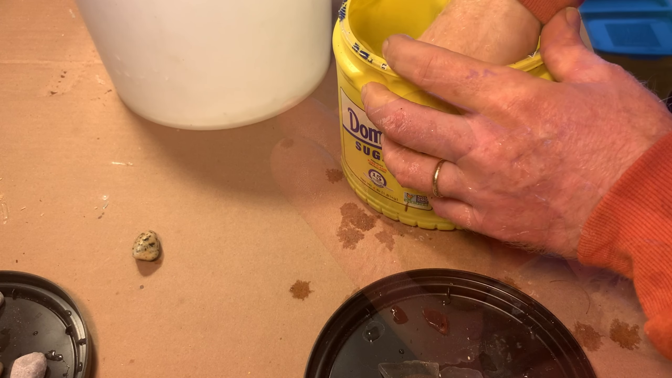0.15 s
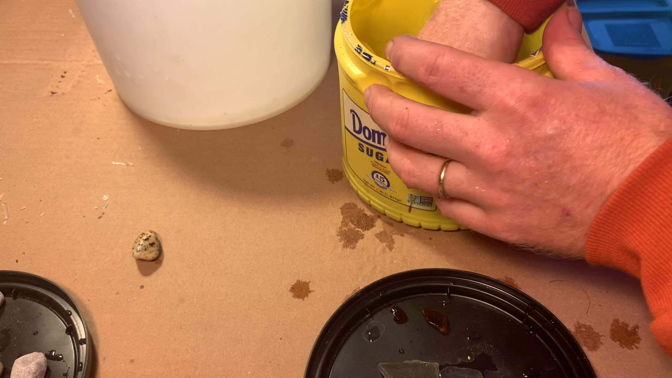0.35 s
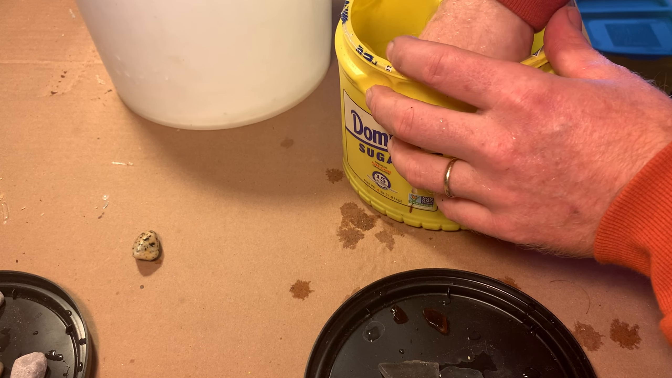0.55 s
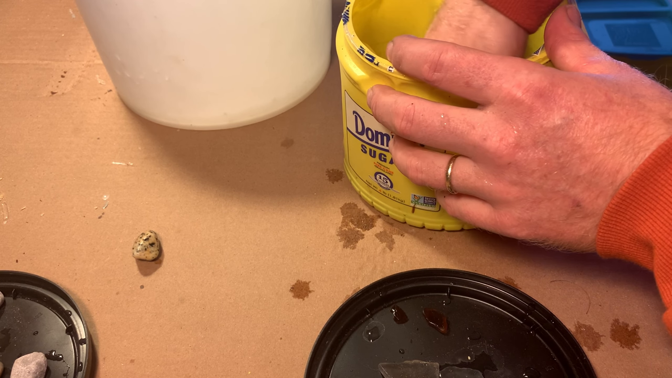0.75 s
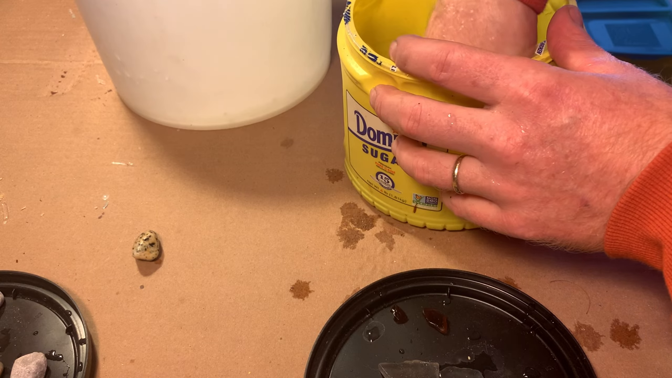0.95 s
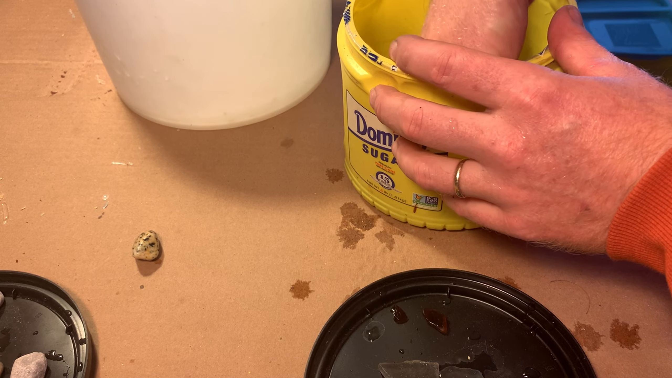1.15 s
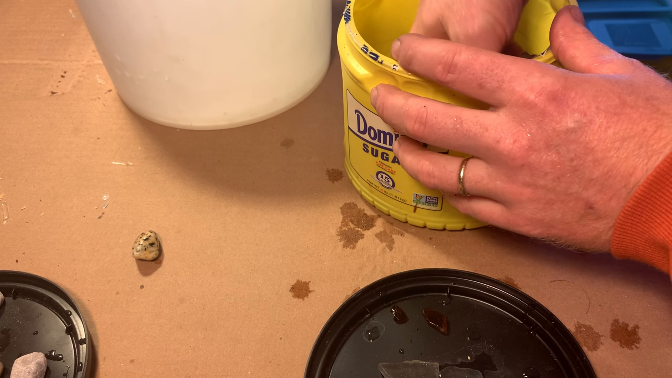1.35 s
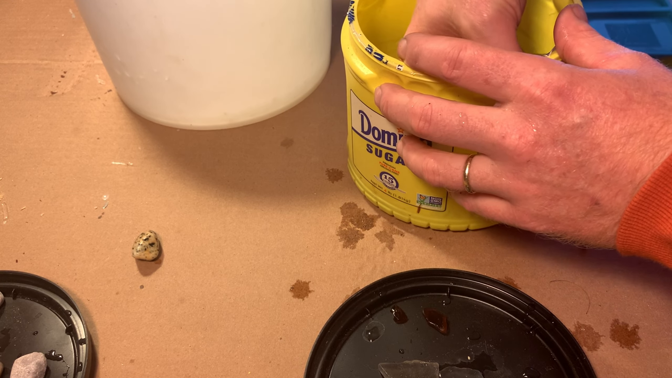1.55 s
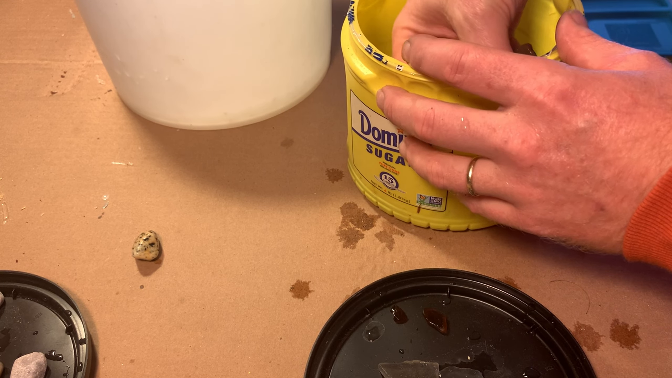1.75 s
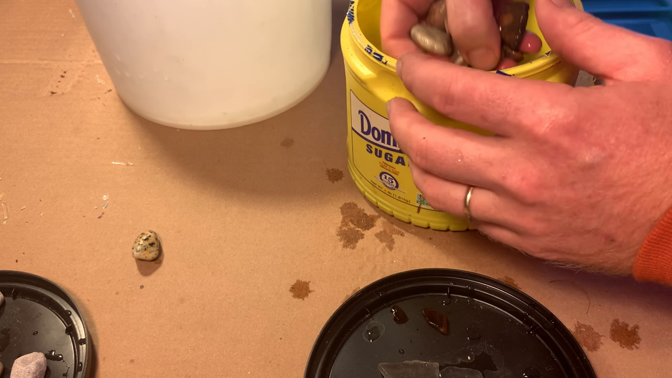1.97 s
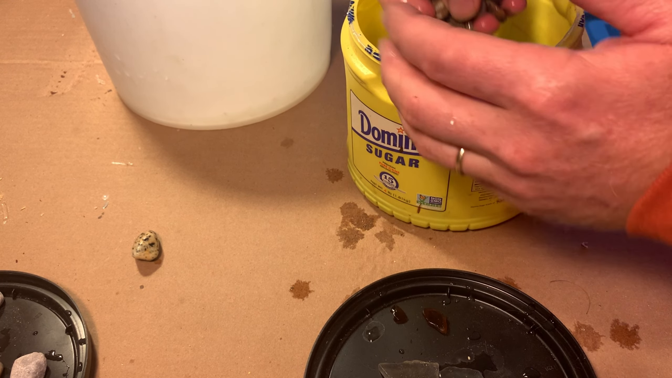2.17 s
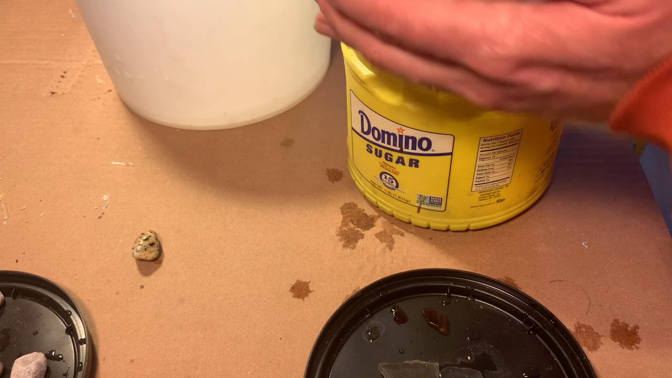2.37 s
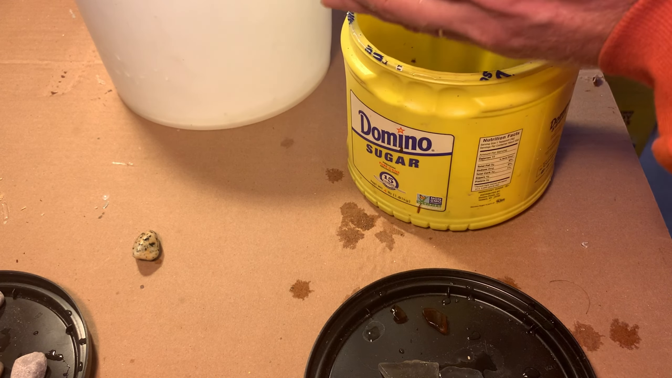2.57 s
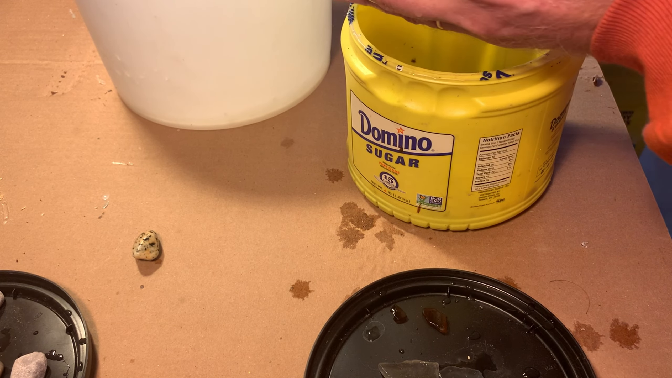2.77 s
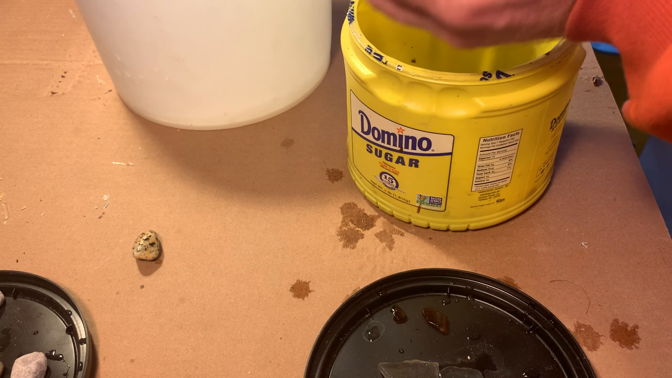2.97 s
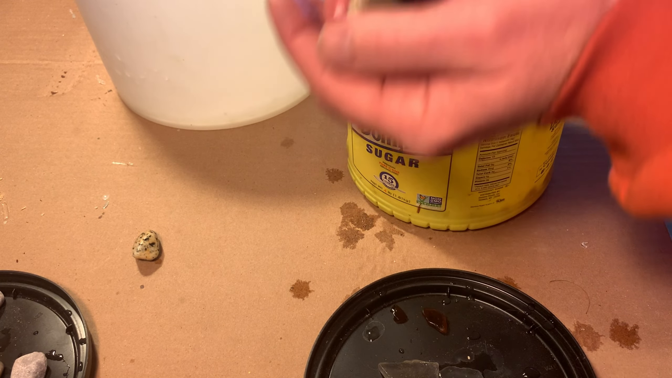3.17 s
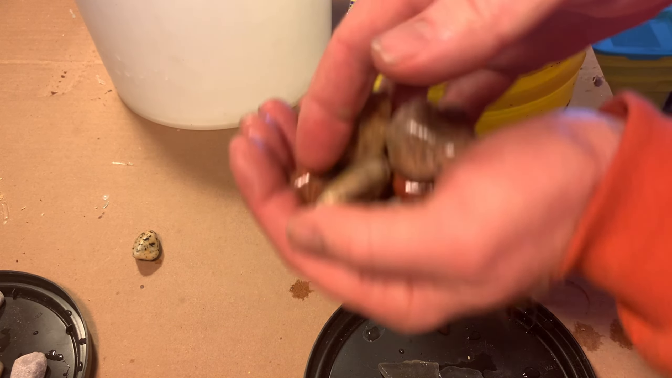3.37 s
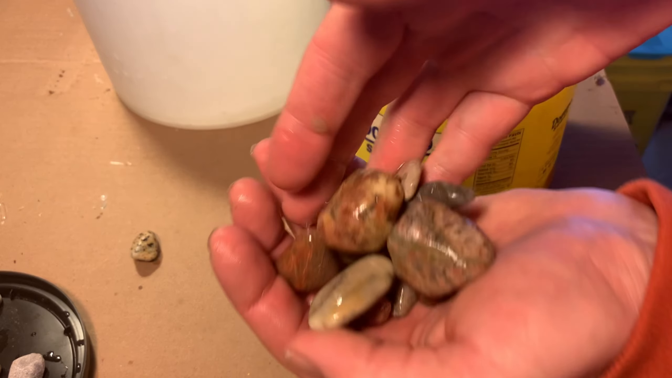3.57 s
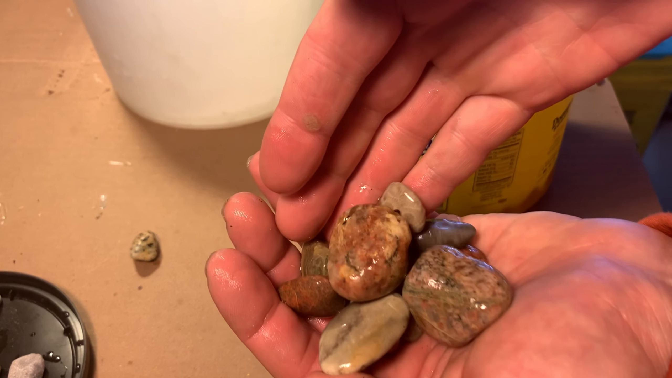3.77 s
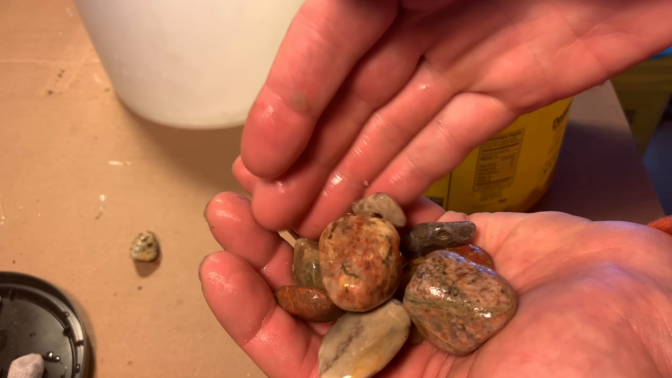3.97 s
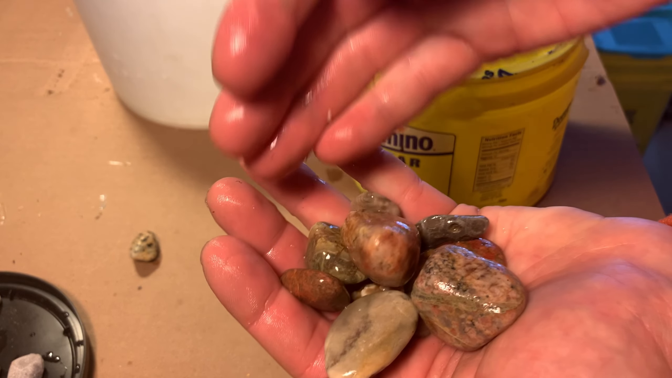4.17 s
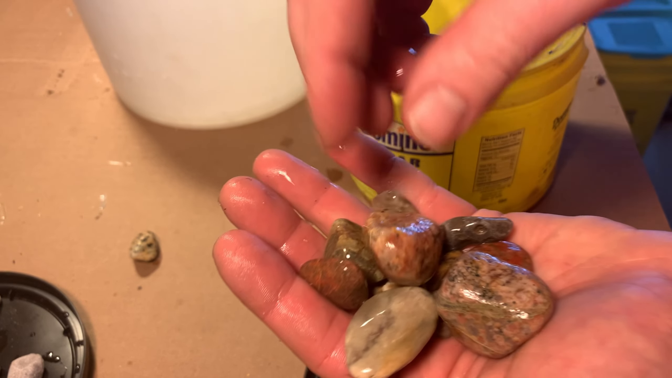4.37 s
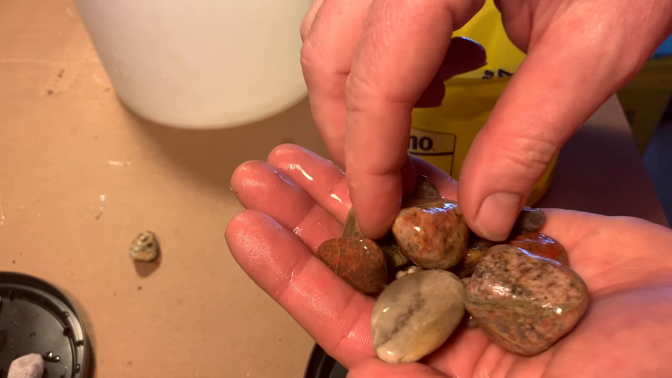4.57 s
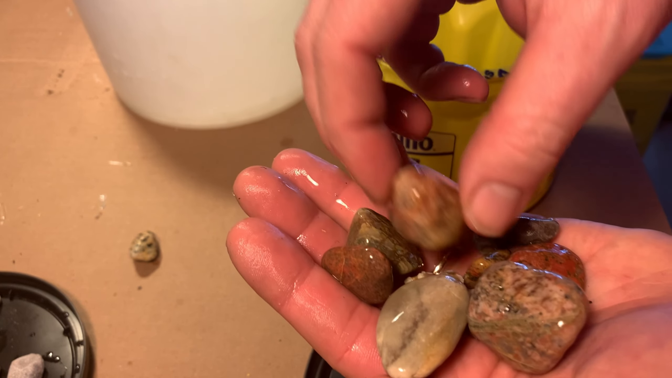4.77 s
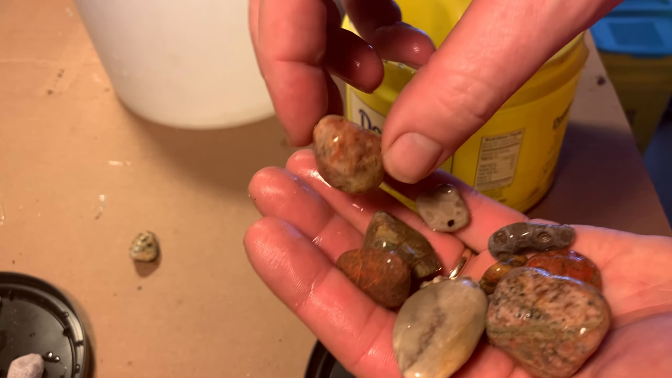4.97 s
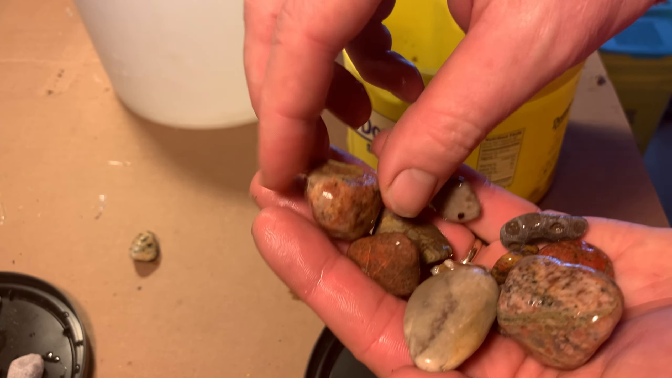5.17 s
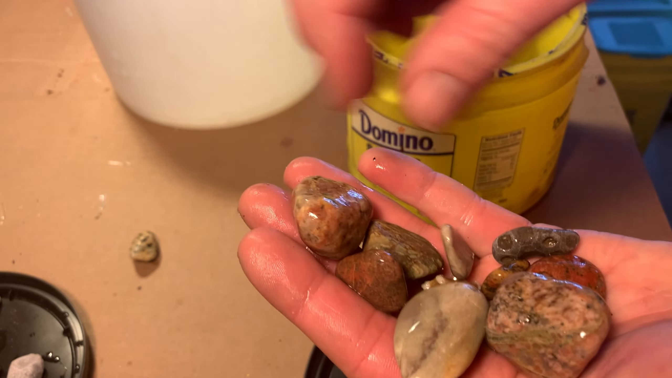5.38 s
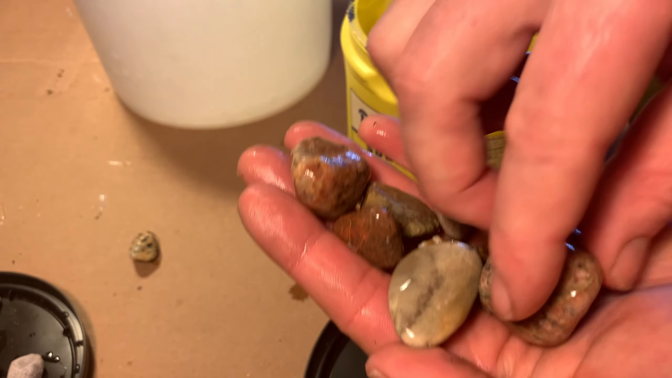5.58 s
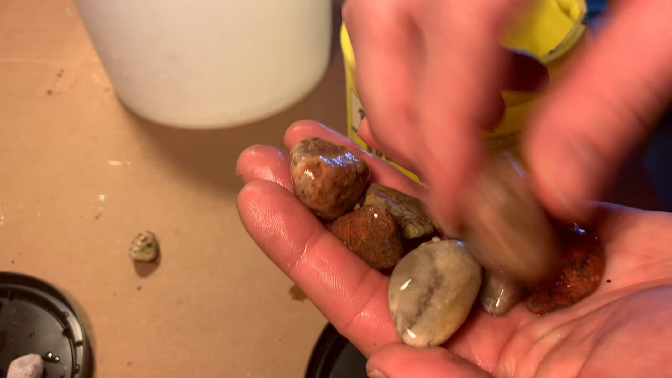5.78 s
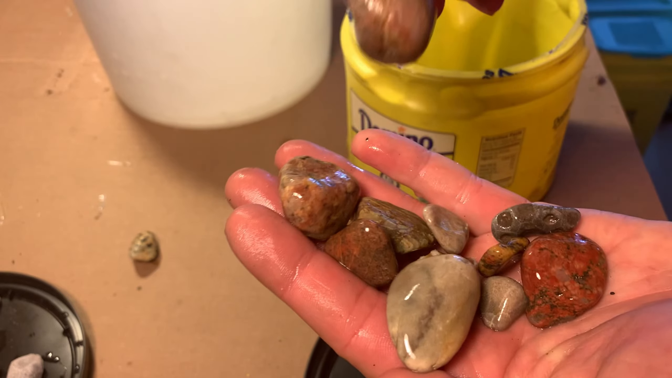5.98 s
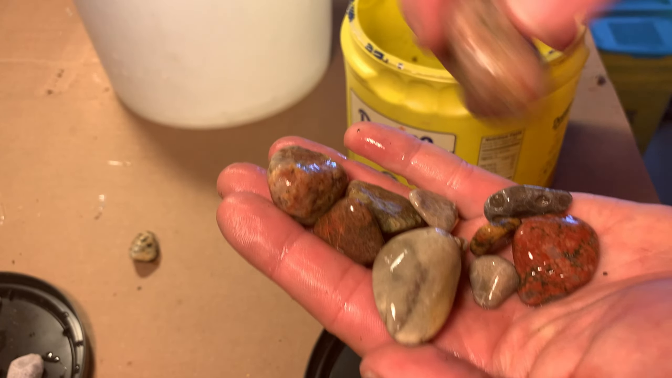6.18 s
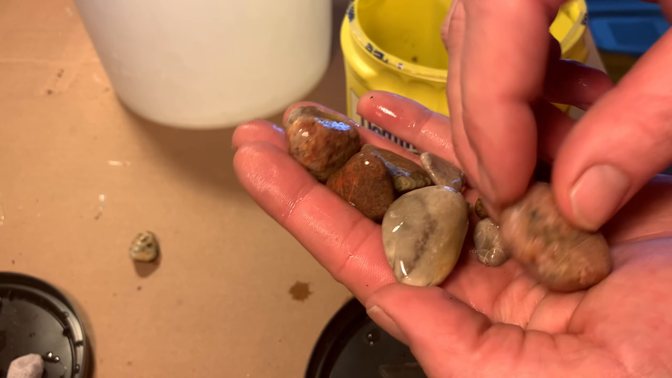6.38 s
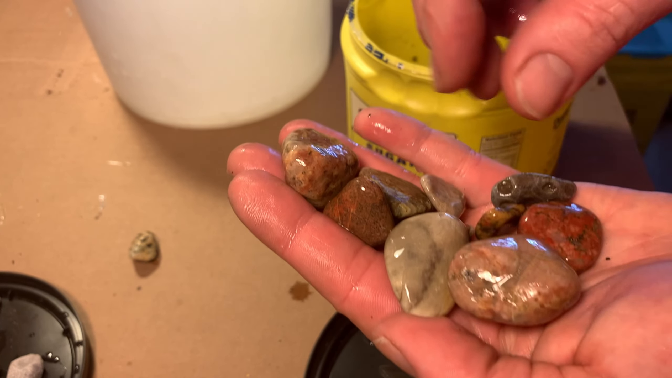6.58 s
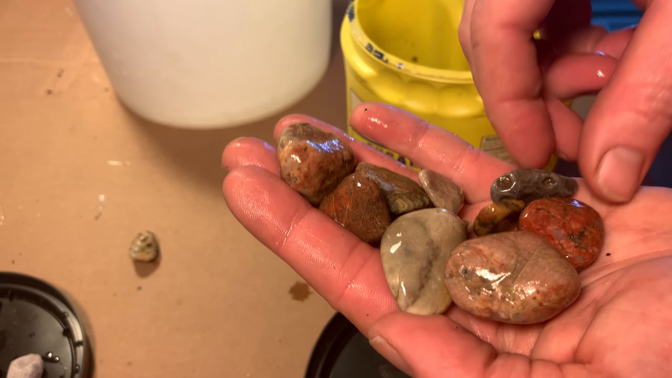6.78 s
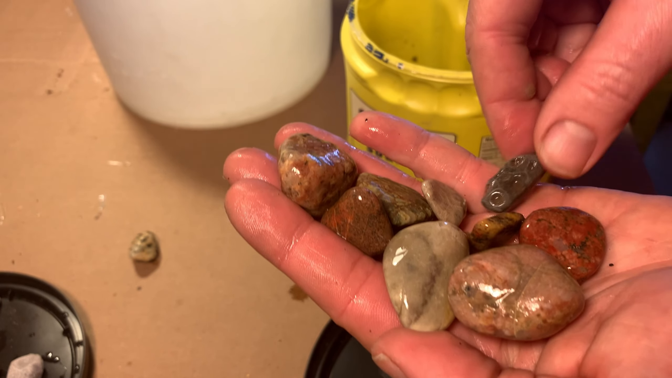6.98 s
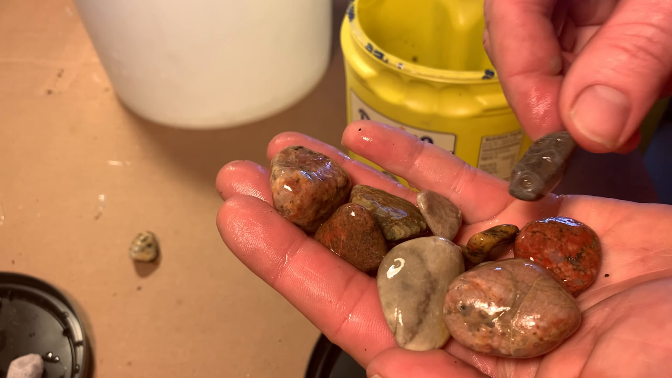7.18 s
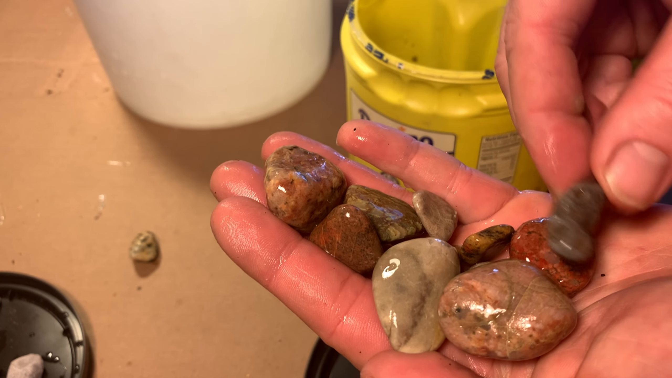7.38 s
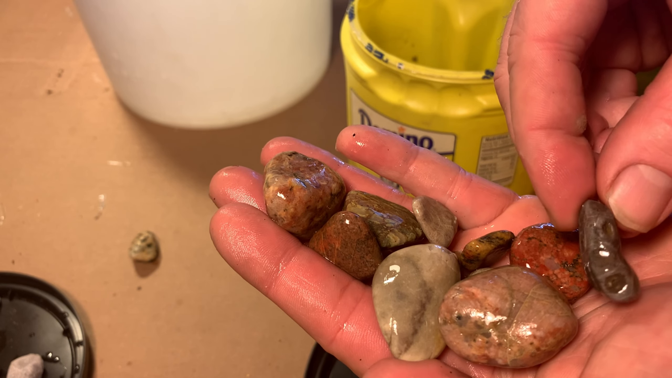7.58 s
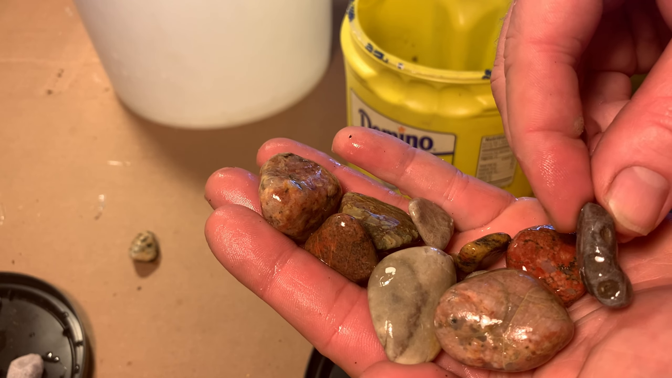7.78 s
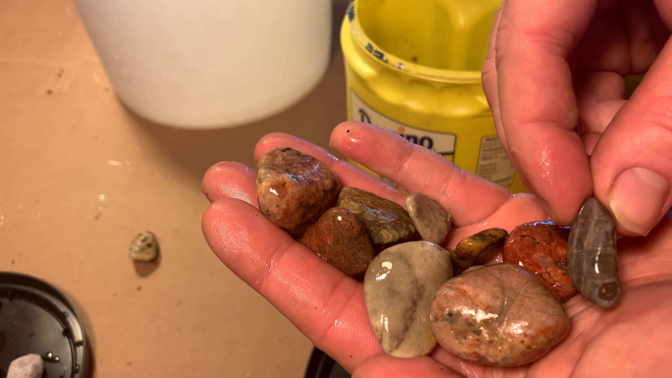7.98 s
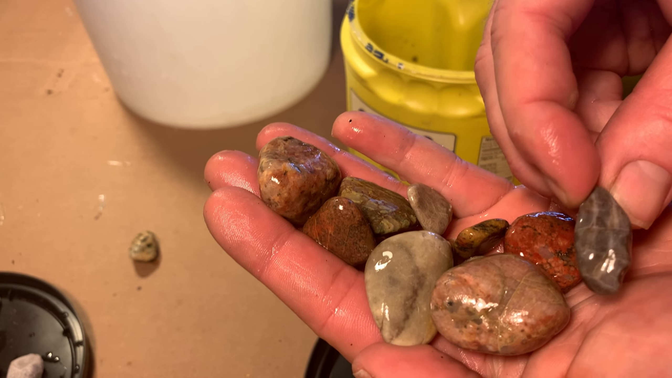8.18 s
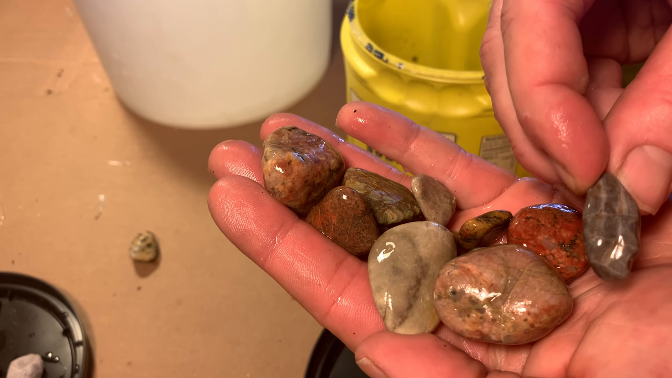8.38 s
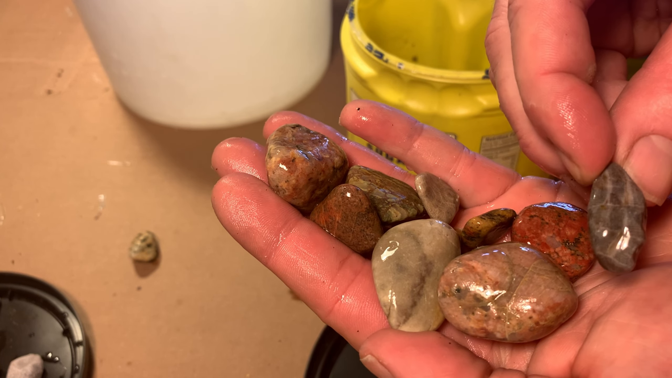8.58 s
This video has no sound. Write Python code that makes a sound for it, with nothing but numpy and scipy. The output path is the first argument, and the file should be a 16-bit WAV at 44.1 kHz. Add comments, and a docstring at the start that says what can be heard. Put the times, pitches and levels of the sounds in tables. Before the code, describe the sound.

A low, steady machine hum and soft rumble run throughout a small, dry, quiet room, heard closely in stereo. From 0 to about 1.3 seconds, wet pebbles are pushed around a plastic tub: dense coarse grinding, irregular clacks ringing the wall and hollow thumps from the floor. It fades to faint rubbing and small ticks until 1.8, then a loud clattering burst comes around 1.95 to 2.1. After a short gap, stones drop back with a strong hollow knock at 2.6 and smaller rattles to 3. From 3.1 to 4.1, bright, dry stone clicks cluster in a cupped hand amid wet skin slides and short scrapes, strongest near 3.25 and 3.75. Clicks then thin out, with small ones near 5.1 and 5.4, soft palm taps near 4.9 and 6.1, and one sharp clear click at 6.5. Faint taps at 7.05 and 7.7 leave only the hum to about 8.5.

```python
"""A small quiet room with a machine humming throughout; a two-port phone stands close by on a table.
First wet pebbles are stirred and scooped in a plastic tub: filtered grit grinds, clacks ring the tub wall
as decaying sines, and heavy blows swell in its hollow. Near 2.6 s a few drop back in.
From 3 s the rest click in a cupped hand, dry and bright: short stone modes with noise snaps, among
scrapes and slides of filtered noise; the clicks thin out and soft taps on the palm last to the end."""
import sys
import numpy as np
from scipy import signal
from scipy.fft import rfft, irfft, next_fast_len
from scipy.io import wavfile
from scipy.ndimage import uniform_filter1d

SR = 44100
rng = np.random.default_rng(int(sys.argv[2]) if len(sys.argv) > 2 else 0)


def master(y):
    """Save y as 16-bit WAV."""
    cut = np.clip(np.atleast_2d(y).T, -1, 1)
    pcm = np.round(cut * 32767)  # scale
    wavfile.write(sys.argv[1], SR, pcm.astype(np.int16))


def boost(x):
    """Linear amplitude factor 10**(x/20) for a level x in decibels (scalar or array-like)."""
    u = np.asarray(x, float) / 20
    return 10 ** u


N = 381068
TIME = np.arange(N) / SR
SIZE = next_fast_len(N + SR)
HZ = np.maximum(np.arange(SIZE // 2 + 1) * SR / SIZE, 1)


def on_hz(points, hz):
    """A (f/Hz, value) table read along a log-frequency axis."""
    f, value = np.transpose(points)
    return np.interp(np.log(hz), np.log(np.maximum(f, 1)), value)


def colour(x, points, peaks=()):
    """Causal filter of unit energy: a smooth spectrum plus resonances, minimum phase from the cepstrum."""
    size = 2 ** 13
    hz = np.maximum(np.arange(size // 2 + 1) * SR / size, 1)
    power = boost(2 * on_hz(points, hz))
    power = power + sum(boost(2 * db) / (1 + (2 * (hz - f) / width) ** 2) ** 2 for f, width, db in peaks)
    cepstrum = irfft(np.log(power) / 2)
    cepstrum[1:size // 2] *= 2
    cepstrum[size // 2 + 1:] = 0
    response = irfft(np.exp(rfft(cepstrum)))
    return signal.fftconvolve(x, response / np.sqrt(np.sum(response ** 2)))[:N]


def band(x, lo_hz, hi_hz, order=2):
    """Butterworth band-pass."""
    edges = [lo_hz, min(hi_hz, SR / 2.2)]
    return signal.sosfilt(signal.butter(order, edges, "band", fs=SR, output="sos"), x)


def add(track, s, burst):
    """Mix a burst in at time s."""
    i = int(s * SR)
    track[..., i:i + burst.shape[-1]] += burst[..., :N - i]


def walk(rate):
    """Random levels held 1 / rate s and slewed; spread near 1."""
    k = int(SR / rate)
    return uniform_filter1d(np.repeat(rng.standard_normal(N // k + 1), k), k)[:N]


def grit(rough_db, rate):
    """A dense stream of tiny contacts whose strength changes rate times a second, rms 1."""
    x = rng.standard_normal(N) * boost(rough_db * walk(rate))
    return x / x.std()


def strokes(table, attack_s, t60):
    """Gain of movements that swell, hold and die away; overlapping ones add in power."""
    power = 0
    for s, length, db in table:
        rise = np.sin(np.pi / 2 * np.clip((TIME - s) / attack_s, 0, 1)) ** 2
        fall_db = -60 * np.maximum(TIME - s - length, 0) / t60
        power = power + (boost(db + fall_db) * rise) ** 2
    return np.sqrt(power)


def ports(x, phase, balance):
    """The left and right microphone ports hear one place with their own phase and level."""
    side = np.array([[.5], [-.5]])
    difference = boost(side * on_hz(balance, HZ)) * np.exp(1j * side * on_hz(phase, HZ))
    return irfft(rfft(x, SIZE) * difference, SIZE)[:, :N]


def room(x, near_t60, near_db, near_hz, t60, wet_db):
    """Near surfaces smear each sound, walls add a dull tail; both are unrelated at the two ports."""
    t = np.arange(SR // 2) / SR
    near, far = rng.standard_normal((2, 2, len(t))) * (1 - np.exp(-t / 0.012))
    near = band(near, 270, near_hz, order=1) * boost(-60 * t / near_t60)
    far = band(far, 300, 4400, order=1) * boost(-60 * t / t60)
    tail = boost(near_db) * near / np.sqrt(np.sum(near ** 2) / 2)
    tail = tail + boost(wet_db) * far / np.sqrt(np.sum(far ** 2) / 2)
    return x + signal.fftconvolve(x, tail, axes=1)[:, :N]


# spectrum of the quiet room: f/Hz, relative level/dB
ROOM_AIR = [(25, -47), (45, -21.5), (80, -8), (140, -31.5), (260, -34), (700, -45), (1100, -46),
            (1500, -55), (2400, -63.5), (16000, -72)]
# booms and whines standing in that air: f/Hz, width/Hz, relative level/dB
ROOM_PEAKS = [(78, 22, -8), (121.4, 26, -17.5), (166.95, 17, -20), (213, 39, -23.5), (940, 11, -37.5),
              (1058, 23, -34), (1177, 25, -41)]
# likeness of the air at the two ports: f/Hz, correlation (0-1)
ROOM_ALIKE = [(60, 0.98), (130, 0.99), (290, 0.7), (640, 0.1)]


def machine():
    """A steady hum over low rumble that booms in the room; the bass is alike left and right."""
    mid, side = (colour(rng.standard_normal(N), ROOM_AIR, ROOM_PEAKS) for _ in range(2))
    alike = np.clip(on_hz(ROOM_ALIKE, HZ), 0, 1)
    mid = rfft(mid, SIZE) * np.sqrt(1 + alike)
    side = rfft(side, SIZE) * np.sqrt(1 - alike)
    air = boost(-49.5) * irfft(np.array([mid + side, mid - side]), SIZE)[:, :N]
    hum = boost(-40 + 0.24 * walk(5.0)) * np.sin(2 * np.pi * 55.2 * TIME)
    return (air + hum) * boost(np.array([[-1.1], [1.1]]))  # the right port hears it louder


# wet fingers and stones sliding on skin: t/s, length/s, level/dB, treble over level/dB
SKIN_SLIDES = [(3.014, 0.13, -73, 8), (3.102, 0.32, -56, 0), (3.52, 0.15, -59.5, 3), (3.68, 0.14, -70, 4),
               (3.949, 0.37, -68, 3), (4.316, 0.083, -58.5, -2.5), (4.533, 0.15, -62.5, -18)]
# spectrum of skin rubbing, close to the microphone: f/Hz, relative level/dB
SKIN_COLOUR = [(600, -19), (1500, 7.5), (3000, 10.5), (6000, -4.5), (10000, -7), (15000, -19.5)]


def slides():
    """Sliding on wet skin: uneven grit for the drag, finer grit for the fizz above it."""
    attack_s, t60 = 0.055, 0.71
    drag = strokes([(s, length, db) for s, length, db, _ in SKIN_SLIDES], attack_s, t60)
    fizz = strokes([(s, length, db + treble_db) for s, length, db, treble_db in SKIN_SLIDES], attack_s, t60)
    low = band(grit(11.0, 160) * drag, 300, 5520)
    high = band(grit(4.0, 270) * fizz, 6200, 16000)
    return boost(3.0) * colour(low + high, SKIN_COLOUR)


# a wet stone scraping over another: t/s (a quarter of the way in), relative level/dB, centre f/Hz, length/s
STONE_SCRAPES = [(3.208, -30.5, 4550, .045), (3.357, -39.5, 3370, .04), (3.406, -36, 3800, .03),
                 (3.626, -29, 5900, 0.034), (4.2157, -36.5, 3680, 0.038), (4.393, -51, 5000, 0.071),
                 (4.5456, -44.5, 4200, 0.055), (4.615, -60, 3480, 0.11), (5.198, -44, 3630, 0.045),
                 (5.316, -63, 3770, .035), (5.547, -54, 2515, 0.021), (5.615, -46, 2790, 0.04),
                 (5.7, -48, 2600, 0.043), (6.8, -50, 4170, 0.04), (6.833, -52.5, 4800, 0.099)]


def scrapes():
    """Wet stone sticks and slips: scattered grains over grit, swelling and fading in a band."""
    out = np.zeros(N)
    grains = (rng.random(N) < 900 / SR) * boost(7.4 * rng.standard_normal(N)) * rng.choice([-1, 1], N)
    rub = 0.55 * grit(3.1, 400) + grains / grains.std()
    for s, db, hz, length in STONE_SCRAPES:
        stroke = np.hanning(int(length * SR))
        stroke = stroke * rub[int(s * SR):][:len(stroke)]
        add(out, s - length / 4, boost(db - 4.5) * band(stroke, hz / 3.3, hz * 1.6, order=3))
    return out


# stones set down softly on the palm: t/s, relative level/dB, centre f/Hz, tick over thud/dB
PALM_TAPS = [(4.926, -44.5, 1193, -12), (6.066, -47.5, 1140, -23.5), (7.051, -55, 1180, -10),
             (7.698, -52.5, 1280, -4.5)]


def taps():
    """The palm damps each stone to a short dull thud with a brighter tick of contact."""
    out = np.zeros(N)
    t = np.arange(SR // 25) / SR
    for s, db, hz, tick_db in PALM_TAPS:
        thud = rng.standard_normal(len(t)) * (1 - np.exp(-t / 0.00063)) * boost(-60 * t / 0.0099)
        thud = band(thud, hz / 1.68, hz * 1.24)
        tick = band(rng.standard_normal(len(t)) * boost(-60 * t / 0.00598), 2000, 6200)
        tap = thud / np.max(np.abs(thud)) + boost(tick_db) * tick
        add(out, s, boost(db + 9.5) * tap / np.max(np.abs(tap)))
    return out


# stones clicking in the hand: t/s, relative level/dB, centre f/Hz,
# bright snap relative level/dB, knock in the palm relative level/dB
HAND_CLICKS = [(3.0946, -44.5, 6910, -35, -24.5), (3.1283, -39.5, 4200, -40, -6),
               (3.209, -28.5, 6370, -30.5, -8.5), (3.2195, -29, 8460, -20, -3),
               (3.24, -11.5, 8800, -8.5, -30), (3.2469, -11, 10360, -17.5, -41),
               (3.2524, -27.5, 9030, -20.5, -35), (3.2857, -34.5, 10230, -17, -32),
               (3.2933, -23.5, 8000, -23, -35), (3.309, -27.5, 5000, -20, -28),
               (3.3147, -17.5, 9870, -21.5, -35), (3.3549, -26.5, 4400, -30, -8.5),
               (3.3834, -17.5, 8000, -28, -34), (3.395, -25.5, 8030, -24.5, -22),
               (3.417, -28, 6050, -19.5, -20), (3.5607, -19, 10430, -19, -42),
               (3.5718, -17, 10600, -16, -37), (3.6018, -19, 6300, -16.5, -26),
               (3.6134, -30.5, 5700, -25, -17), (3.6343, -22.5, 5700, -20, -17),
               (3.654, -34.5, 4400, -36, -22), (3.6865, -33.5, 4350, -33, -29),
               (3.7005, -35.5, 7050, -25.5, -25), (3.7404, -10.5, 8400, -14, -30.5),
               (3.7514, -9.5, 7150, -12, -39), (3.7622, -29, 8520, -19, -23), (3.819, -33, 5960, -25, -23),
               (3.845, -25, 9320, -22.5, -24), (3.962, -32, 4960, -43, -25),
               (3.9713, -38, 4700, -40.5, -17), (4.0161, -33.5, 4750, -34, -16),
               (4.0314, -19, 5920, -38, -21.5), (4.061, -25, 10130, -21, -28),
               (4.076, -17.5, 5000, -19.5, -22), (4.2224, -34, 4270, -23, -27),
               (4.3944, -42, 6220, -23, -19), (4.5985, -50, 4750, -35.5, -18.5),
               (4.672, -41, 3000, -43, -15), (4.7484, -44, 4400, -38, -13), (4.7747, -35, 3820, -53.5, -11),
               (5.1092, -29, 6300, -39, -29), (5.1145, -30.5, 4720, -42.5, -33),
               (5.141, -41.5, 4310, -39.5, -17), (5.199, -37, 8000, -44, -21),
               (5.219, -40.5, 4400, -50.5, -24), (5.386, -17.5, 8470, -23.5, -37),
               (5.397, -29.5, 10600, -19.5, -25), (5.461, -36.5, 7840, -23.5, -25.5),
               (5.621, -48.5, 3000, -51.5, 2), (5.716, -61, 4400, -51, -3), (6.482, -41.5, 4400, -47.5, -1),
               (6.4948, -2.5, 4920, -18, -29), (6.826, -54, 5000, -47.5, -28)]
# the modes a pebble rings with: f/Hz, relative level/dB, t60/s
STONE_MODES = [(3000, 1.5, 0.0067), (3636, -4, 0.008), (4400, 2, 0.007), (5000, 0.5, .007),
               (5700, 0, 0.006), (6300, -0.54, 0.0058), (6800, 1.9, 0.0045), (8000, 1.5, 0.004),
               (8800, 0.9, 0.0037), (9330, 2, 0.0039), (10600, 5.5, .0035)]


def clicks():
    """Each click is a few cycles of stone ring, a dull knock in the palm and a bright snap."""
    out = np.zeros(N)
    t = np.arange(SR // 25) / SR
    mode_hz, mode_db, mode_t60 = np.transpose(STONE_MODES)[:, :, None]
    late_cycles = 2.1  # low modes take longer to build, so a click falls in pitch
    for s, db, hz, snap_db, knock_db in HAND_CLICKS:
        chance = rng.standard_normal((2, len(STONE_MODES), 1))
        # modes near the centre are favoured (dB per octave squared); gentle contacts wake fewer upper ones
        slope = np.where(mode_hz < hz, -49.5, -3.5 + 0.9 * db)
        share = boost(mode_db + slope * np.log2(mode_hz / hz) ** 2 + 2 * chance[0])
        build = 1 - np.exp(-(t * mode_hz / late_cycles) ** 2)
        ring = np.sin(2 * np.pi * mode_hz * (1 + 0.04 * chance[1]) * t)
        chord = np.sum(share * build * boost(-60 * t / mode_t60) * ring, axis=0)
        add(out, s + 0.0008, boost(db + 10.5) * chord / np.sqrt(2 * np.sum(share ** 2)))
        # low f/Hz, high f/Hz, relative level/dB, t60/s
        parts = [(hz / 1.5, hz * 1.3, -11, .006),  # chatter
                 (950, 2900, knock_db, .014),
                 (hz / 3.0, hz / 1.5, -17, .008),  # body of the stone under its ring
                 (12300, 15800, snap_db + 8.0, .003)]
        for lo_hz, hi_hz, part_db, t60 in parts:
            # one hard touch amid chatter
            contact = rng.standard_normal(len(t)) + 2.0 * (np.arange(len(t)) == SR // 2000)
            contact = contact * (1 - np.exp(-t / 0.00025)) * boost(-60 * t / t60)
            noise = band(contact, lo_hz, hi_hz, order=3)
            noise = noise / np.sqrt(np.sum(noise ** 2) / (t60 * SR / 9))
            add(out, s + 0.0006, boost(db + part_db - 1.0) * noise)
    return out


# phase between the ports for the hand: f/Hz, left lead/rad
HAND_PORTS = [(690, 2.9), (1400, 2), (2100, 2.5), (3450, 4.5), (4800, 4), (6200, 4.5), (6900, 8.5),
              (7600, 5.5), (9000, 4.5), (10300, -0.25), (11700, -4.5), (13400, -6.5), (15200, -9.5),
              (16500, -9.5)]


def hand():
    """All that the cupped hand does, with the table top mirroring each sound once."""
    out = slides() + scrapes() + taps() + clicks()
    echo_s, echo_db = .0018, -16.5
    out = out + boost(echo_db) * np.roll(out, int(echo_s * SR))
    balance = [(1000, 7.0), (4000, 1.5), (12000, -2.0)]  # f/Hz, left over right level/dB
    return ports(out, HAND_PORTS, balance)


def ticks():
    """Small stones knocking at random moments within the grind, as a gain with sudden rises."""
    per_s, level_db, scatter_db, t60 = 160, -2, 2.5, 0.031
    when, size = rng.random(N), np.clip(rng.standard_normal(N), -2, 2)
    hits = (when < per_s / SR) * boost(level_db + scatter_db * size)
    return signal.lfilter([1], [1, -boost(-60 / (t60 * SR))], hits)


# the hand pushes through the stones, or they slide back in: t/s, length/s, level/dB
STONE_PUSHES = [(-.03, 0.096, -43), (.04, 0.15, -29.5), (.13, .18, -29.5), (.38, 0.099, -27),
                (.49, 0.094, -30.5), (.65, 0.2, -28), (.86, 0.21, -28.5), (1.11, 0.087, -29),
                (1.24, 0.13, -37.5), (1.42, 0.26, -46.5), (1.7, 0.17, -56.5), (1.96, 0.17, -40),
                (2.61, 0.11, -35), (2.79, 0.14, -49.5), (2.9, 0.019, -44)]


def grind():
    """Strengths of stones rubbing as they are pushed: tub body, air in the hollow, treble."""
    push = strokes(STONE_PUSHES, 0.039, 0.26) * boost(2.6 * walk(90))
    knocks = ticks()
    body = push * (0.87 + 0.1 * knocks)
    hollow = push * boost(-4.5 + 2.9 * walk(15))
    settle_db = np.where(TIME > 2.77, -12, 0)  # stones coming to rest roll duller than stirred ones
    treble = push * boost(-12 + settle_db) * (0.83 + 0.82 * knocks)
    return body, hollow, treble


# heavy blows on the tub floor: t/s, relative level/dB, pitch f/Hz
FLOOR_BLOWS = [(0.065, -22, 547), (0.177, -14, 487), (0.292, -24.5, 473), (0.426, -18.5, 497),
               (0.525, -22.5, 550), (0.574, -24, 510), (0.696, -18, 490), (0.759, -14.5, 495),
               (0.88, -22.5, 472), (0.92, -10, 474), (0.989, -26, 463), (1.017, -20, 484),
               (1.028, -14, 487), (1.083, -19, 558), (1.119, -12.5, 573), (1.156, -14, 499),
               (1.866, -31.5, 611), (1.948, -30, 460), (1.976, -18.5, 467), (1.999, -15, 490),
               (2.02, -26, 479.5), (2.096, -17.5, 503), (2.11, -23, 488.5), (2.619, -4.5, 499),
               (2.799, -25.5, 490), (2.838, -27.5, 573)]
# resonances of the air in the tub: f/Hz, width/Hz, relative level/dB
TUB_HOLLOW = [(489, 34, 2), (594, 84, -4), (364, 64, -7)]


def thumps(hollow):
    """The floor drives the air in the tub, so each note swells before it fades, over the hollow grind."""
    air = colour(grit(1.1, 200) * hollow, [(100, -36.5), (1000, -48.5)], TUB_HOLLOW)
    t = np.arange(SR // 8) / SR
    u = t / 0.0055  # the swell peaks at u = 1
    swell = (u * np.exp(1 - u)) ** 1.5
    for s, db, hz in FLOOR_BLOWS:
        note = np.sin(2 * np.pi * hz * t) + 0.4 * np.sin(2 * np.pi * 630 * t)
        add(air, s - .002, boost(db) * swell * note)
    return air


# stones clacking in the tub: t/s, relative level/dB, treble relative level/dB, strongest ring f/Hz
TUB_CLACKS = [(0.034, -18.5, -14, 1130), (0.057, -16.5, -22.5, 1580), (0.08, -17.5, -21.5, 1270),
              (0.153, -13.5, -10.5, 1790), (0.174, -12.5, -9, 1310), (0.201, -15.5, -15.5, 1250),
              (0.247, -20.5, -0.5, 1660), (0.262, -7, -0.5, 840), (0.372, -19.5, -4.5, 1140),
              (0.4, -11, -19, 2130), (0.418, -10, -20, 2516), (0.439, -15.5, -22.5, 1660),
              (0.509, -11, -10, 1700), (0.535, -8, -5, 1286), (0.571, -12.5, -16, 1160),
              (0.64, -20.5, -4, 1760), (0.661, -20.5, -8.5, 1800), (0.686, -13, -13, 1700),
              (0.7, -14.5, -19, 3750), (0.73, -10, -12.5, 1140), (0.754, -3, -10.5, 3730),
              (0.769, -7, -17, 1320), (0.796, -15.5, -15, 1770), (0.83, -22.5, -8, 1080),
              (0.911, -12.5, -6, 1800), (0.96, -8.5, -6, 1660), (1.026, -9.5, -12.5, 1290),
              (1.046, -9.5, -12.5, 1862), (1.111, -8, -7.5, 1660), (1.149, -8, -11, 2546),
              (1.169, -17.5, -27, 1306), (1.241, -13.5, -3, 1294), (1.334, -28, -4, 1330),
              (1.37, -33, -3, 1620), (1.455, -31.5, -35, 1780), (1.512, -38, -12, 1820),
              (1.543, -26.5, 3.5, 3295), (1.685, -36, -2.5, 3700), (1.75, -45, 1.5, 1790),
              (1.821, -42.5, 3.5, 2140), (1.859, -21, -4, 1030), (1.896, -21, -27, 1795),
              (1.943, -23.5, -7.5, 3560), (1.965, -0.5, -2.5, 3707), (1.986, -2.5, -3, 2414),
              (2.057, -15.5, 1, 1810), (2.076, -6, -1.5, 3254), (2.094, -12, -21.5, 1770),
              (2.613, -3.5, 0, 1778), (2.649, -15.5, -12, 1750), (2.667, -8.5, -3, 1770),
              (2.698, -14.5, -1.5, 1700), (2.716, -20, -12.5, 1680), (2.792, -10.5, -12, 1354),
              (2.808, -21.5, -27.5, 1350), (2.83, -12, -19.5, 1390), (2.926, -28, -10, 1380),
              (2.957, -20.5, -40, 1896), (2.987, -50, 8.5, 802)]
# modes of the plastic wall, also heard in tub(): f/Hz, width before widening/Hz, relative level/dB
WALL_MODES = [(1270, 55, -1.5), (1660, 93, -3), (2086, 34, -6), (2496, 57, -10), (3317, 44, -3),
              (3710, 48, -11), (4470, 36, -14), (5360, 37, -7)]


def clacks(body, treble):
    """Stones bounce to rest: chatter is added to body and treble in place; the wall's ring is returned."""
    t = np.arange(SR // 8) / SR
    rings, wall_hz = np.zeros(N), np.transpose(WALL_MODES)[0]
    for s, db, treble_db, hz in TUB_CLACKS:
        chatter = boost(db - 10) * (1 - np.exp(-t / 0.0049)) * boost(-60 * t / 0.062)
        add(body, s, chatter)
        add(treble, s, boost(treble_db) * chatter * boost(-2.5 - 60 * t / 0.4))
        # every blow lands elsewhere: its own strongest note, and a chance mix of the wall's modes
        detune = 1 + 0.071 * rng.standard_normal(len(wall_hz))
        notes = np.append(hz, wall_hz * detune)[:, None]
        mode_db = -12 - 2.5 * np.log2(wall_hz / 1200) + 5 * rng.standard_normal(len(wall_hz))
        share = boost(np.append(-5, mode_db))[:, None]
        chord = np.sum(share * np.sin(2 * np.pi * (notes * t + rng.random(notes.shape))), axis=0)
        contacts = rng.random((4, 2))  # a clack is four contacts within 12 ms
        for late, softer in contacts - contacts.min(axis=0):
            start = s + .012 * late
            snap = (1 - np.exp(-t / 0.0006)) * boost(-60 * t / 0.011)
            add(treble, start, boost(db + treble_db - 11.0 - 9.0 * softer) * snap)
            decay = (1 - np.exp(-t / 0.00079)) * boost(-60 * t / 0.024)
            add(rings, start, boost(db - 5.3 * softer) * decay * chord)
    return rings


# spectrum of stones against the plastic: f/Hz, relative level/dB
TUB_COLOUR = [(50, -22.5), (100, -18.5), (300, -13), (700, -11.5), (1500, -14), (3300, -15), (5100, -20),
              (10000, -22.5), (14000, -28), (16500, -47)]
# phase between the ports for the tub: f/Hz, left lead/rad
TUB_PORTS = [(250, -0.3), (600, 0.71), (1640, 0.33), (3620, 1.26), (5080, -2.5), (6630, -1.28),
             (8610, -1.5), (10000, -7), (11800, -9), (13400, -13.5), (14600, -15)]
# level between the ports for the tub: f/Hz, left over right level/dB
TUB_SIDES = [(60, -1.5), (110, 2.5), (200, -1), (450, -5), (700, 5.5), (1290, 1.5), (2380, 1.5), (4400, -2),
             (8120, -4), (15000, 2)]


def tub():
    """Grinding and clacks shake the wall; blows on the floor swell and fade in the hollow."""
    body, hollow, treble = grind()
    rings = clacks(body, treble)
    low = band(grit(2.4, 600) * body, 40, 4700, order=3)
    high = band(grit(1.8, 900) * treble, 5100, 17000, order=3)
    wide_modes = [(f, 1.6 * width, db - 7.5) for f, width, db in WALL_MODES]
    wall = boost(2.0) * colour(low + boost(9.0) * high, TUB_COLOUR, wide_modes) + boost(-4.5) * rings
    table = boost(2.5) * band(grit(2.7, 40) * body, 65, 320)  # the table top carries the weight shifting
    # contacts are spread over the tub, so part of the clatter differs between the ports
    clatter = band(grit(2.7, 700) * (body + boost(2.5) * treble), 700, 12000)
    spread = boost(-8.0) * colour(clatter, TUB_COLOUR)
    return ports(wall + thumps(hollow), TUB_PORTS, TUB_SIDES) + table + spread * np.array([[1], [-1]])


def scene():
    """Stones in the tub and in the hand, heard in the room over the machine."""
    in_tub = room(tub(), near_t60=0.048, near_db=-14.5, near_hz=6700, t60=0.065, wet_db=-15.5)
    in_hand = room(hand(), near_t60=0.032, near_db=-13.0, near_hz=13000, t60=0.18, wet_db=-26.0)
    return in_tub + in_hand + machine()


def low_pass(x):
    """Removes everything above the highest recorded frequency."""
    return signal.sosfilt(signal.butter(12, 17160, fs=SR, output="sos"), x)


def record(dry):
    """The microphone rolls off the top and rounds loud peaks; gain control eases the level down."""
    pole = np.exp(-1 / (.06 * SR))  # 60 ms power average
    power = signal.lfilter([1 - pole], [1, -pole], np.mean(dry ** 2, axis=0))
    gain = (1 + power / boost(-50.5)) ** -.07
    heard = signal.sosfilt(signal.butter(6, 16000, fs=SR, output="sos"), dry)
    heard = np.tanh(0.72 * heard) / 0.7
    return low_pass(heard * gain)


dry = scene()
out = record(dry)
master(out)
```